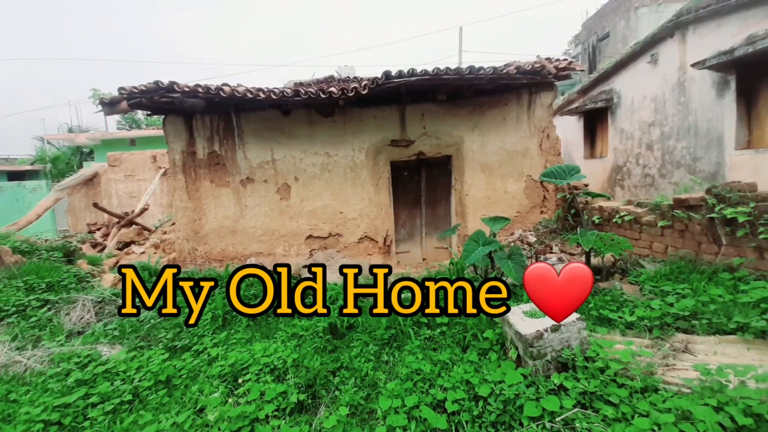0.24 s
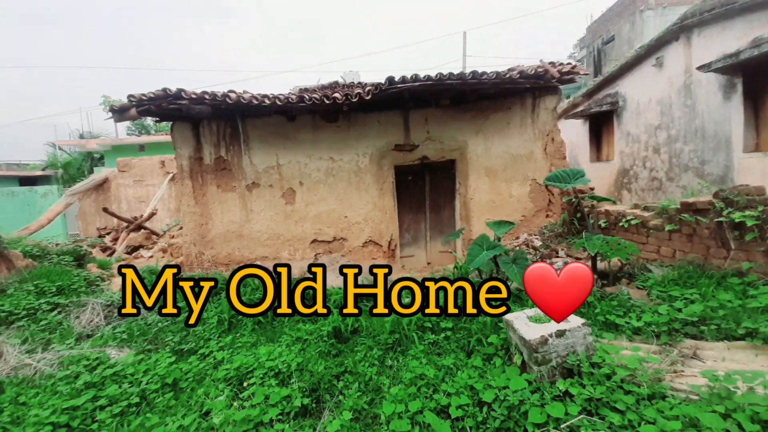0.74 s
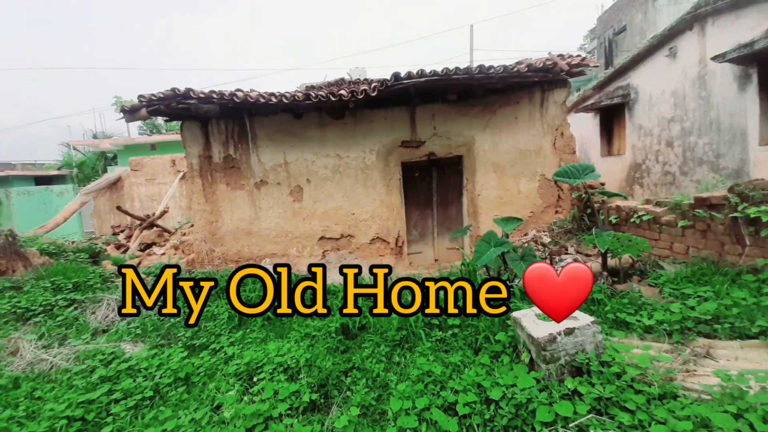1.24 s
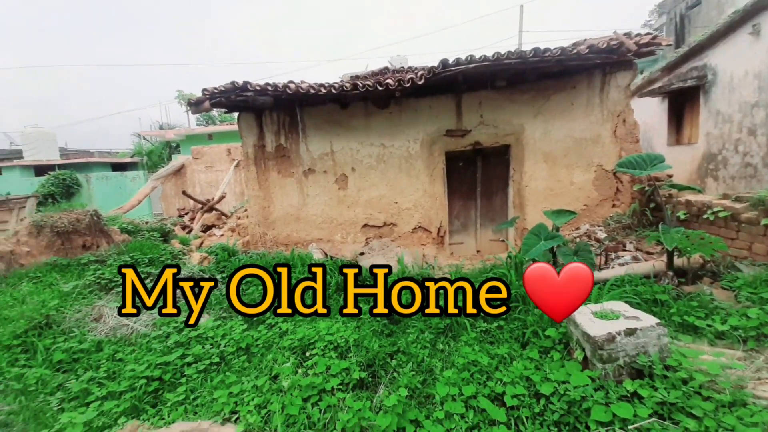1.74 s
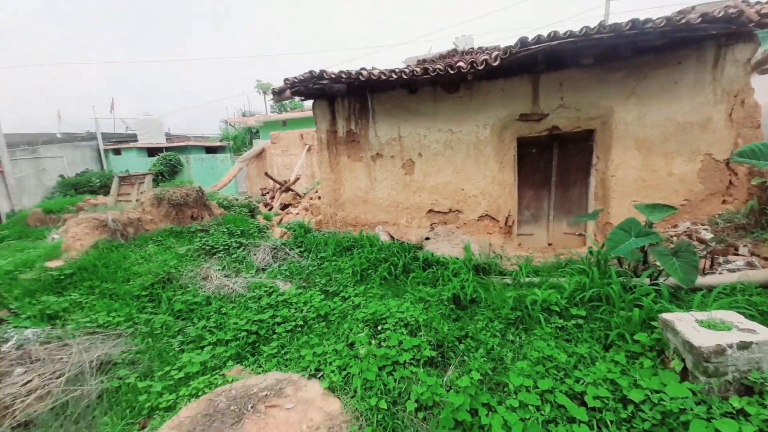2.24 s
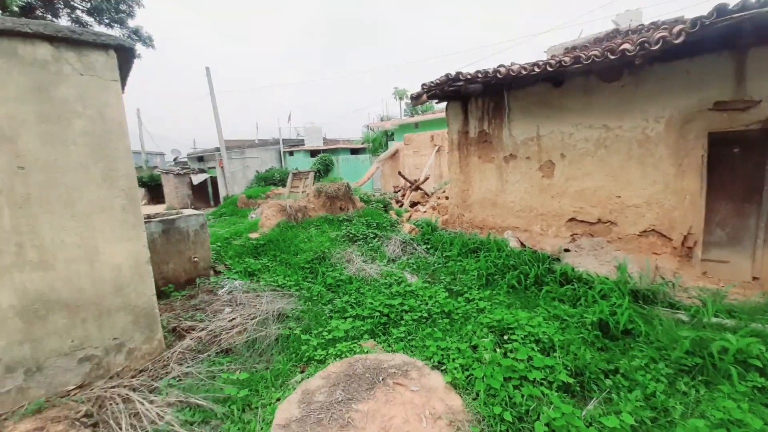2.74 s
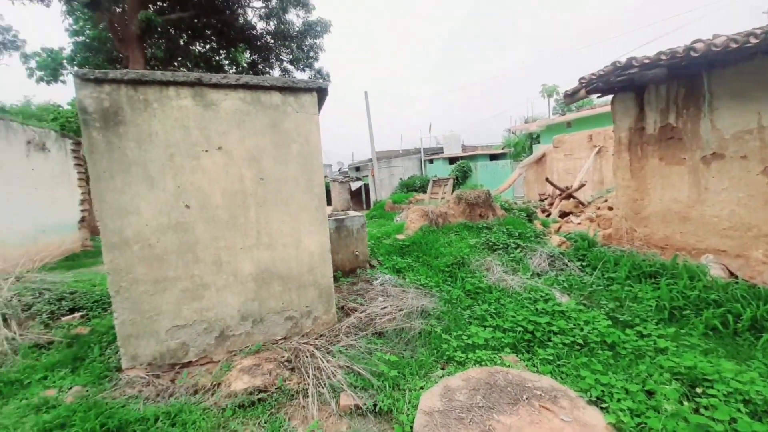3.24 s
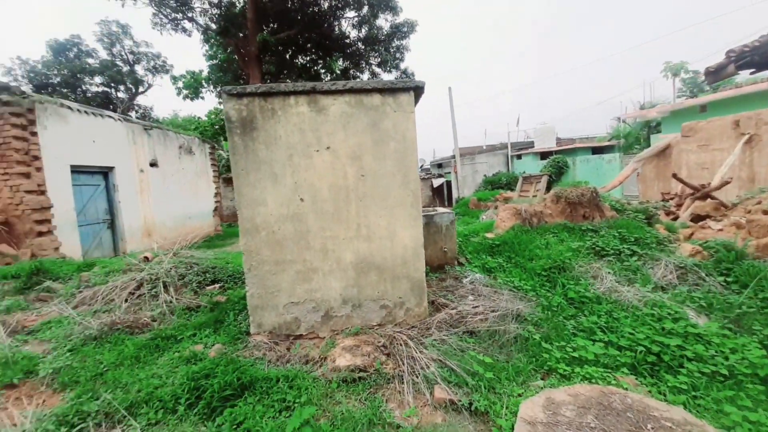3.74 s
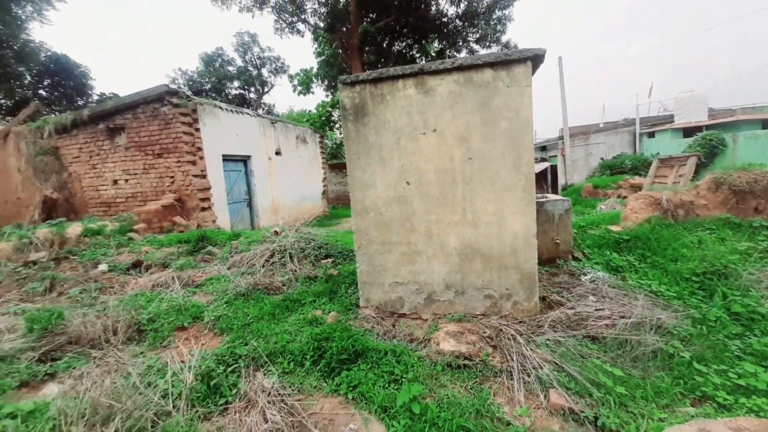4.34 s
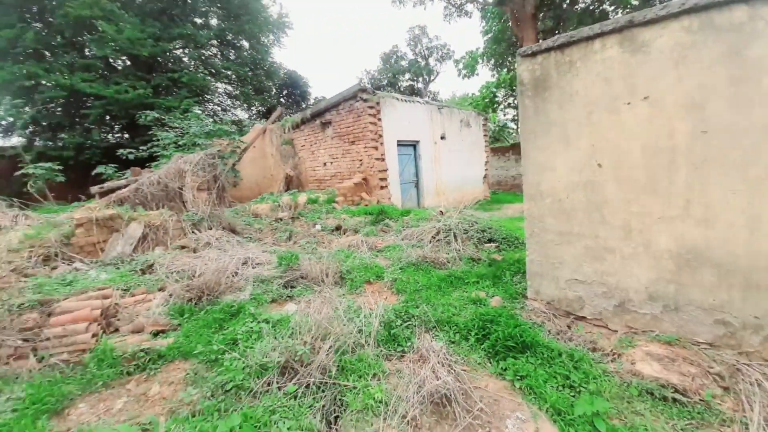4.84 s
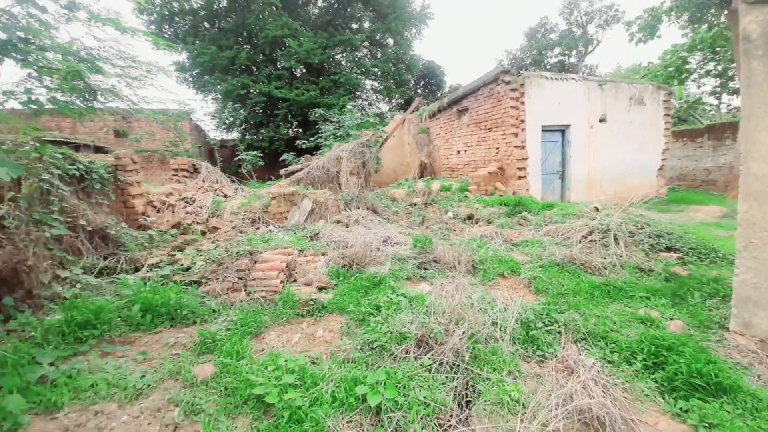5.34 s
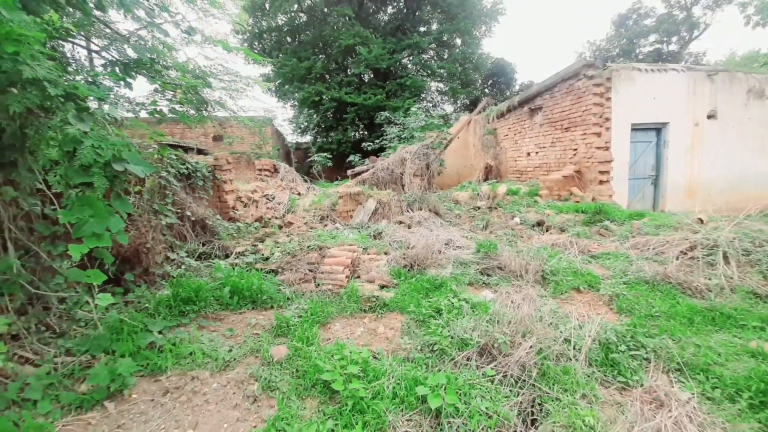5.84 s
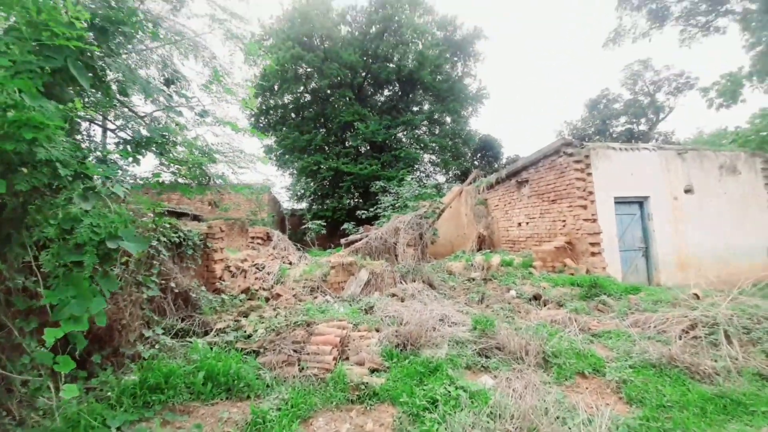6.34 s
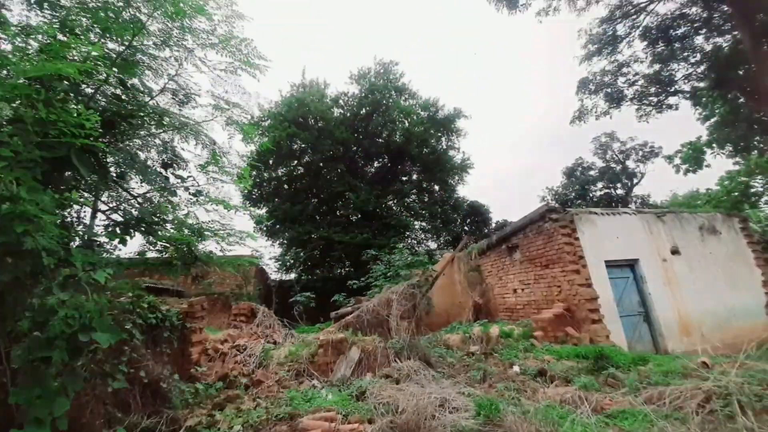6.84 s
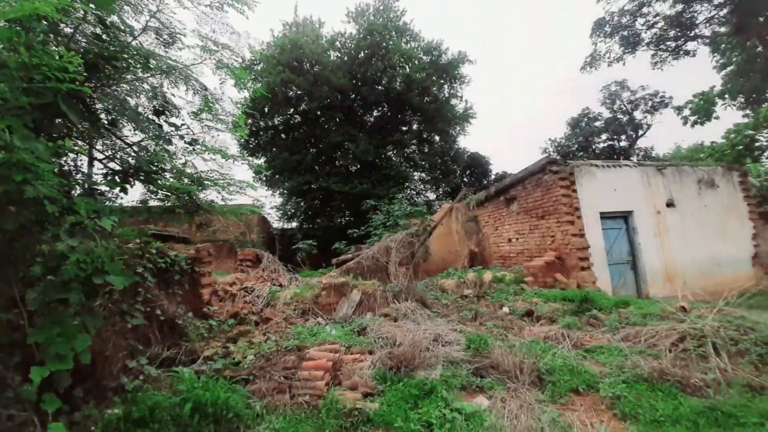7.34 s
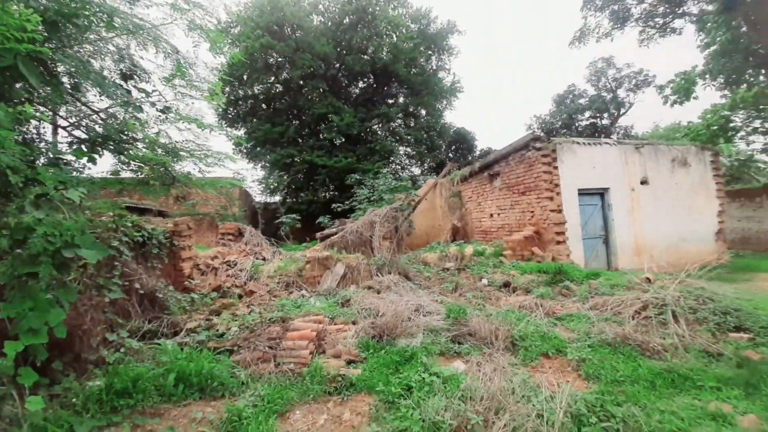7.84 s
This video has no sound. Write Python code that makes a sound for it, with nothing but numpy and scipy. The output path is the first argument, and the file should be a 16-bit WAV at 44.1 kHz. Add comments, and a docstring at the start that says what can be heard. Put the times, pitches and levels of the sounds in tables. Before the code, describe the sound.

A quiet overgrown village yard with low distant rumble and soft open air. Faint bird chirps come first, then slow steps crush dry grass, with crackles, swishes and two loud sharp twig snaps around the middle of the steps. A bent stem creaks briefly, soles shuffle with dull knocks, then only birds, echoing off house walls, and a faint high tone remain. Handheld stereo microphone close to the walker.

```python
"""A low village rumble, open air and a small bird's chirp are heard first, with a faint, distant high tone.
Then someone takes a few slow steps through dry grass: filtered noise swishes, and bursts of it crackle.
Short damped clicks snap as twigs, trains of slips creak as a bent stem, and dull knocks are shuffling feet.
Gliding sine notes are the birds between the house walls; slow level curves shape the noise of the village."""
import sys
import numpy as np
from scipy import signal
from scipy.fft import rfft, irfft, next_fast_len
from scipy.io import wavfile
from scipy.ndimage import map_coordinates

SR = 44100
rng = np.random.default_rng(int(sys.argv[2]) if len(sys.argv) > 2 else 0)


def master(y):
    """Save y as 16-bit WAV."""
    cut = np.clip(np.atleast_2d(y).T, -1, 1)
    pcm = np.round(cut * 32767)  # scale
    wavfile.write(sys.argv[1], SR, pcm.astype(np.int16))


N = 357201

# Twigs that break. Each row: start in seconds, crack level setting in dB, crack pitch in Hz,
# knock setting in dB against the crack, bright tick in dB against the crack, tearing time in ms.
TWIGS = [(0.938, -49, 2190, -0.5, -23, 1), (1.233, -47.5, 3830, -7, -8.5, 1),
         (1.3116, -48, 2660, -3, -23, 1), (1.3359, -47.5, 2080, -4, -22, 1),
         (1.6325, -44, 4200, -12, -4.5, 2.6), (1.6442, -42, 4560, -18, -13.5, 1),
         (1.7106, -48.5, 2720, 1.5, -16.5, 2), (1.8717, -42.5, 4260, -6, -7, 2),
         (1.9155, -50.5, 3500, -4, -5, 1.16), (1.9708, -49.5, 4570, 0, 1.5, 1),
         (2.1058, -48.5, 4400, -13, 7, 1), (2.1839, -47, 2970, -11, -10, 1.02),
         (2.2614, -43.5, 3060, 0.5, -12, 2.1), (2.2846, -39, 2300, -3, -21, 0.78),
         (2.3181, -41, 3470, -25, -12, 1), (2.3796, -26.5, 3780, -9, -21.5, 1.3),
         (2.3881, -47.5, 3050, 8, -9, 2), (2.4084, -45.5, 3900, -4, 2, 1.7), (2.4533, -45, 3970, -4, 3, 1),
         (2.5289, -18, 2660, -2, -43, 2.6), (2.6108, -42, 2690, -5, -25, 1),
         (2.637, -44, 2700, -10, -11, 1), (2.6763, -14.5, 2760, -6, -35, .3),
         (2.8739, -38.5, 3170, -9.5, -22, 2), (2.901, -44, 3700, -5, -10, 1),
         (3.2398, -46, 3760, -25, -11, 1), (3.4103, -36.5, 3560, -21, -22, 1),
         (3.4492, -40, 3030, -26, -11.5, 1), (3.5624, -27.5, 2800, -38, -28, .5),
         (3.5742, -38.5, 2900, -26, -14.5, 1.7), (3.6177, -46, 3050, -20, -14, 1),
         (3.6748, -44.5, 2560, -18, -26, 1), (3.8279, -47.5, 3220, -21, -5.5, 1),
         (4.1178, -64.5, 4200, -8, 18, 1), (4.1628, -39.5, 2920, -19, -26, 3),
         (4.206, -59.5, 4000, -10, 4, 1), (4.2219, -30.5, 2570, -16.5, -30, 1.4),
         (4.2223, -30, 4330, -14, -24.5, 1.2), (4.4313, -45.5, 3680, -5, -7.5, 2),
         (4.534, -35, 2240, -7, -36.5, 1), (4.6369, -44.5, 2700, -38, -15, 1),
         (5.116, -58.5, 1980, 1, -2, 1.1), (5.471, -67.5, 4080, -10, 5, 1),
         (5.5286, -48.5, 3720, -6, -9.5, 1), (5.539, -53.5, 3470, -9, 12.5, .6)]
# How far the twigs lean left. Each row: frequency in Hz, left against right in dB.
TWIG_LEAN = [(500, -0.5), (1200, -3.5), (2500, 11.5), (5000, 4), (9000, 14)]
# Small straws: mean level setting and scatter in dB, middle pitch in Hz
STRAW_DB, STRAW_SCATTER_DB, STRAW_HZ = -57.5, -2, 3800
STRAW_KNOCK_DB, STRAW_TICK_DB = -5.5, -1.5  # settings against the crack, in dB


def twigs(sweep, count=52):
    """Twigs break under the sole; small straws break at random, the more often the harder a leg sweeps."""
    out = np.zeros((2, N))
    for start, *twig in TWIGS:
        add(out, start, snap(*twig))
    # one straw for each equal share of the total sweeping
    shares = (np.arange(count) + rng.random(count)) / count
    times = np.searchsorted(np.cumsum(sweep) / sweep.sum(), shares) / SR
    variations = np.clip(rng.standard_normal((count, 3)), -2, 2)
    for start, (size, pitch, tick) in zip(times, variations):
        level_db = STRAW_DB + STRAW_SCATTER_DB * size
        straw_hz = STRAW_HZ * np.exp(.2 * pitch)
        add(out, start, snap(level_db, straw_hz, STRAW_KNOCK_DB, STRAW_TICK_DB + 4 * tick, 0.93))

    def lean(hz):
        gains = amp(along(TWIG_LEAN, hz) * np.array([[.5], [-.5]]))
        return gains / np.sqrt(np.mean(gains ** 2, axis=0))

    return filtered(out, lean)


SPLINTER_DB, SPLINTER_FOLLOWS = -2.5, 0.6  # dB against the crack at zero tick, and dB per dB of tick


def snap(db, hz, knock_db, tick_db, tear_ms):
    """A twig gives way fibre by fibre within a few ms, rings briefly and rattles the stalks around it."""
    t = np.arange(SR // 25) / SR
    fibres = amp(-27.5 - 60 * t / .028) * rng.standard_normal((2, len(t)))  # the fading rattle
    tears_at = (rng.uniform(.15, 1, 5) * np.clip(tear_ms, .1, 8) * SR / 1000).astype(int)
    fibres[:, 0] = 1  # the first break
    tears = rng.standard_normal(5) + .5 * rng.standard_normal((2, 5))
    fibres[:, tears_at] += 0.28 * np.sqrt(tear_ms) * tears
    knock = [(652, 1.86, knock_db - 11.0), (1370, 0.91, knock_db - 0.5)]
    crack = (hz, 1.7, 0)
    splinter = (6300, 1.3, SPLINTER_DB + SPLINTER_FOLLOWS * tick_db)
    tick = (12600, 1.6, tick_db)
    wood = click(knock + [crack, splinter, tick])
    sound = signal.fftconvolve(fibres, wood[None], axes=1)
    return amp(db + 21.5) * sound * np.linalg.norm(wood) / np.linalg.norm(sound, axis=1, keepdims=True)


# A bent stem sticks and slips. Each row: start in seconds, length in seconds,
# first and last middle rate in slips per second, middle slip level in dB.
CREAKS = [(3.466, .05, 450, 400, -37), (3.51, 0.062, 390, 280, -35), (3.927, 0.056, 130, 44, -37.5),
          (4.003, 0.078, 84, 130, -38.5)]
# The stem squeaks. The row: start in seconds, length in seconds, start, middle and end pitch in Hz, level in dB.
SQUEAK = (4.164, .018, 2150, 2400, 3000, -37)


def creaks():
    """A stem slips at a gliding, uneven rate; each slip rings it briefly, and one quick glide squeaks."""
    slips = np.zeros(N)
    for start, length, first_rate, last_rate, db in CREAKS:
        n = int(length * SR)
        rate = np.geomspace(first_rate, last_rate, n) * np.exp(0.17 * wobble(150)[:n])
        slipping = np.diff(np.floor(np.cumsum(rate) / SR), prepend=-1) > 0
        add(slips, start, slipping * amp(db + 1.5 * rng.standard_normal(n)))
    ring = click([(2620, 1.67, 1), (7000, 0.73, -21)])
    out = signal.fftconvolve(slips, ring / np.abs(ring).max())[:N]
    start, *note, db = SQUEAK
    add(out, start, amp(db) * whistle(*note, 0))
    return sides(10.6) * out


# Soft knocks of the soles on the ground. Each row: start in seconds, tap level in dB,
# thud setting in dB against the tap, left against right in dB.
KNOCKS = [(2.262, -31, -14, 2), (4.429, -47.5, -3, 0), (5.001, -44.5, -6, -21), (5.116, -52, -11, 2),
          (5.175, -43, -3, -17), (5.237, -43, -24, -3), (5.293, -37, -12, -8), (5.341, -34.5, -12.5, -7),
          (5.408, -42.5, -7, -16), (6.262, -56, 7, -17), (6.503, -46.5, -4.5, -8.5)]
SETTLE_S = 0.00611  # from the tap to the thud
THUMP_DB, THUMP_FADE_DB_PER_S = -24, 149.5  # ground rumble against the tap, and its fade
PRESS_S = 0.058  # the weight comes on, in seconds


def knocks():
    """The sole meets firm ground with a dull, gritty tap and settles with a low thud a moment later."""
    out = np.zeros((2, N))
    t = np.arange(SR // 25) / SR
    tap = click([(830, 0.85, -2.0), (2830, 1.0, -9.5)])
    thud = click([(350, 0.86, 0)])
    for start, db, thud_db, pan_db in KNOCKS:
        grit = amp(-29.5 - 60 * t / 0.15) * rng.standard_normal((2, len(t)))
        grit[:, 0] = 1
        gritty_tap = signal.fftconvolve(grit, tap[None], axes=1) / np.abs(tap).max()
        add(out, start, amp(db) * sides(pan_db) * gritty_tap)
        low_thud = thud / np.abs(thud).max()
        add(out, start + SETTLE_S, amp(db + thud_db + 4.0) * sides(pan_db) * low_thud)
    thumps = [(start, 0, db + THUMP_DB) for start, db, *_ in KNOCKS]
    return out + strokes(thumps, PRESS_S, THUMP_FADE_DB_PER_S) * rush(RUMBLE)


# The full weight crunches a tuft. Each row: start in seconds, length in seconds, level setting in dB.
TUFTS = [(1.618, 0.051, -53.5), (1.86, 0.056, -55), (2.562, 0.08, -47), (2.646, 0.036, -47),
         (2.708, 0.044, -41), (4.168, 0.044, -51.5), (4.212, 0.039, -46), (4.526, 0.036, -48),
         (4.631, 0.019, -55.5)]
# Colour of that crunch. Each row: frequency in Hz, strength in dB.
TUFT_COLOUR = [(500, -7.5), (1200, -5.5), (2400, -3), (3400, -6.5), (5000, -7.5), (6500, -12.5),
               (10000, -20.5)]


def tufts():
    """Under the full weight, a bundle of straws collapses in one short, dense crunch."""
    weight = np.zeros(N)
    for start, length, db in TUFTS:
        add(weight, start, amp(db + 0.5) * np.sqrt(np.abs(np.hanning(int(length * SR)))))
    straws = fractures(rate=760, spread_db=4.0, life_s=0.00071)
    return weight * sides(4) * crunch(TUFT_COLOUR, straws, rub_db=-8.5)


# A leg sweeps through the blades. Each row: start of the hold in seconds, hold in seconds, level setting in dB.
SWEEPS = [(0.86, 0.074, -66), (1.27, .08, -69.5), (1.66, .14, -63), (1.83, 0.097, -58), (2.02, .16, -57.5),
          (2.28, .17, -55.5), (2.7, 0.055, -56), (2.93, .12, -62.5), (3.11, .1, -57), (3.25, .33, -54.5),
          (3.66, .22, -62), (4.03, .09, -60), (4.18, .06, -55), (4.35, .08, -64), (4.52, .1, -66)]


def leg_sweeps():
    """The strength of the sweeping leg: the blades bend in 0.07 s, then settle at 85 dB per second."""
    return strokes(SWEEPS, attack_s=.07, fade_db_per_s=85)


# A sole presses on the grass. Each row: start of the hold in seconds, hold in seconds,
# crackle and crush level settings in dB.
STEPS = [(0.844, 0.15, -69, -74), (1.202, 0.45, -64.5, -61.5), (1.647, 0.31, -54.5, -61),
         (2.072, 0.27, -55, -63.5), (2.3, .09, -45.5, -50.5), (2.69, .07, -43.5, -53),
         (2.887, 0.53, -58, -65.5), (3.45, 0.11, -51, -57), (3.624, 0.091, -60.5, -61.5),
         (3.938, 0.21, -59.5, -61), (4.167, 0.11, -55.5, -61.5), (4.407, 0.21, -56.5, -60),
         (5.167, 0.29, -82, -71)]
EASE_DB_PER_S = 127  # the weight comes off
# Colours of the crushed mat, the crackling stalks and the swishing blades (clothes use the last one too).
# Each row: frequency in Hz, strength in dB.
CRUSH = [(200, -23.5), (450, -1.5), (1000, 3), (1700, -1), (3000, -1.5), (6000, -70)]
CRACKLE = [(900, -27.5), (1800, -2.5), (2800, 3), (4200, 3.5), (6000, -1), (8000, -1.5), (9500, -33),
           (14000, -29.5)]
SWISH = [(3000, -4), (6000, -5), (8000, 5), (9800, -6), (11200, 0), (12400, 6.5), (14000, 0.5), (16000, 2)]


def grass(sweep):
    """The sole crushes the mat, dry stalks crackle, and blades swish along the leg, mostly on the left."""
    crackling = strokes([(start, hold, db) for start, hold, db, _ in STEPS], PRESS_S, EASE_DB_PER_S)
    crushing = strokes([(start, hold, db) for start, hold, _, db in STEPS], PRESS_S, EASE_DB_PER_S)
    clumps = amp(1.2 * wobble(45))  # uneven thickness, a gain near 1
    stalks = fractures(rate=520, spread_db=6.5, life_s=.0007)
    mat = unit(stalks + fractures(rate=140, spread_db=3.0, life_s=0.0022))
    tips = unit(.6 * stalks + fractures(rate=400, spread_db=7, life_s=.0008))
    crush = amp(1) * crushing * sides(1.1) * crunch(CRUSH, mat, rub_db=-4.0)
    crackle = amp(-1.5) * crackling * sides(3.2) * crunch(CRACKLE, stalks, rub_db=-2.0)
    swish = amp(3) * sweep * sides(11.5) * crunch(SWISH, tips, rub_db=-1.5)
    return clumps * (crush + crackle + swish)


def fractures(rate, spread_db, life_s):
    """Amplitude of dry stalks giving way at random: each break starts at once and dies within a few ms."""
    sizes = amp(spread_db * np.minimum(rng.exponential(size=N), 2.5)) ** 2
    breaks = (rng.random(N) < rate / SR) * sizes
    fall = np.exp(-1 / (life_s * SR))
    return unit(np.sqrt(signal.lfilter([1], [1, -fall], breaks)))


def crunch(spectrum, breaks, rub_db):
    """Noise of rms 1 that bursts with every break, over the even rubbing of the blades or threads."""
    mid, side = rng.standard_normal((2, N))
    pair = np.array([mid + .8 * side, mid - .8 * side])
    return unit(coloured(breaks * pair, spectrum) + amp(rub_db) * rush(spectrum))


# Clothes brush softly as the walker turns. Each row: start of the hold in seconds, hold in seconds, level in dB.
BRUSH = [(.26, .12, -80), (4.7, .4, -76.5), (5.5, .5, -76)]


def clothes():
    """A faint, high brushing of fabric, made of bursts on threads over an even rubbing."""
    threads = fractures(rate=200, spread_db=3, life_s=.002)
    brushing = strokes(BRUSH, attack_s=0.13, fade_db_per_s=11.5)
    return brushing * sides(8) * crunch(SWISH, threads, rub_db=-2.5)


# Single bird chirps; the second row is the first one's faint echo off a wall.
# Each row: start in seconds, length in seconds, start, middle and end pitch in Hz,
# level in dB, trill depth in Hz.
CHIRPS = [(0.134, 0.048, 4800, 3320, 2400, -61.5, 102), (0.188, .07, 4400, 3630, 3050, -71, 60),
          (.35, 0.044, 4300, 4600, 4940, -73, 100), (1.289, 0.0445, 4100, 4210, 4230, -58, 0),
          (1.389, 0.12, 1750, 1700, 1690, -61, 30), (1.56, 0.04, 3750, 4370, 4800, -55, 347),
          (2.785, 0.15, 6000, 5640, 5600, -67, 80), (3, 0.063, 3140, 2980, 3070, -56.5, 21),
          (3.067, 0.031, 3920, 4280, 4140, -47, 40), (3.823, 0.11, 5080, 4450, 3970, -61, 90),
          (4.115, 0.052, 4400, 4180, 4170, -59, 2), (5.596, 0.12, 6000, 5860, 5770, -68, -4),
          (5.836, 0.031, 3060, 3370, 2950, -61.5, 8), (5.981, 0.054, 3080, 3400, 2710, -60.5, 6),
          (6.123, 0.055, 6100, 6460, 6770, -64, 95), (6.246, 0.069, 4700, 4090, 3840, -59, 377),
          (6.291, 0.079, 3950, 4060, 4340, -55.5, 410), (6.452, 0.052, 6300, 6370, 6580, -67.5, 52),
          (6.544, 0.041, 6050, 6300, 6800, -63, 63), (6.675, 0.091, 4500, 3850, 2890, -53.5, 59),
          (6.902, 0.053, 3444, 3250, 3170, -63.5, 78), (7.024, 0.089, 6250, 5730, 5070, -67, 200),
          (7.07, 0.1, 5200, 4690, 4590, -54.5, 226)]
# Runs of one repeated note. Each row: start in seconds, length in seconds, note spacing in seconds,
# start and end pitch of the note in Hz, level in dB at the start and at the end of the run.
RUNS = [(0.487, .075, 0.022, 3740, 4260, -71, -58), (1.017, .19, .066, 4380, 4275, -54, -57)]
# The birds sound blurred at first, drier around 3 s, and most blurred from about 6 s.
# Each row: time in seconds, level in dB of the sound sent to the echoes.
BLUR = [(0, -2), (3.2, -8), (6.2, -0.5)]
NOTE_SHARE = 0.61  # part of the spacing that a note in a run fills
WALL_S, WALL_DB = .064, -19  # echo off a house wall: delay, and level against the sound sent to the echoes


def birds():
    """Small birds call from the trees, singly and in runs; a house wall repeats them, the yard blurs them."""
    calls = np.zeros(N)
    for start, length, start_hz, middle_hz, end_hz, db, trill_hz in CHIRPS:
        add(calls, start, amp(db) * whistle(length, start_hz, middle_hz, end_hz, trill_hz))
    for start, length, spacing, start_hz, end_hz, first_db, last_db in RUNS:
        note = whistle(NOTE_SHARE * spacing, start_hz, (start_hz + end_hz) / 2, end_hz, 0)
        for late in np.arange(0, length, spacing):
            note_db = first_db + (last_db - first_db) * late / length
            add(calls, start + late, amp(note_db) * note)
    direct = sides(1.0) * calls
    blur_db, = curves(BLUR)
    echoing = amp(blur_db) * direct
    wall = filtered(echoing, lambda hz: np.exp(-2j * np.pi * hz * WALL_S))  # a pure delay
    return direct + amp(WALL_DB) * wall + yard(echoing, stretch=2.7)


def whistle(length, start_hz, middle_hz, end_hz, trill_hz):
    """A pure note that bends through three pitches, with a fast trill on it when trill_hz is not 0."""
    t = np.arange(int(length * SR)) / SR
    u = t / length
    bend = np.polyfit([0, .5, 1], [start_hz, middle_hz, end_hz], 2)
    hz = np.polyval(bend, u) + trill_hz * np.sin(2 * np.pi * 125 * t)
    return np.sin(np.pi * u) ** 0.61 * np.sin(2 * np.pi * np.cumsum(hz) / SR)


# The yard's echo. Each row: frequency in Hz, seconds to fall by 60 dB before stretching.
YARD = [(300, 0.53), (2500, 0.18), (6000, 0.33), (14000, 0.12)]


def yard(x, stretch):
    """The diffuse answer of the walls: a fading noise tail, 10 ms late, in which the lows last longest."""
    hz, t, noise = signal.stft(rng.standard_normal((2, SR)), SR, nperseg=256)
    fade = amp(-60 * t / (stretch * along(YARD, hz)[:, None]))
    tail = signal.istft(noise * fade, SR, nperseg=256)[1]
    tail = np.pad(tail / np.linalg.norm(tail[0]), ((0, 0), (SR // 100, 0)))
    return signal.fftconvolve(x, tail, axes=1)[:, :N]


# The village, its rumble quieter behind the shed.
# Each row: time in seconds, level settings in dB of the rumble and of the murmuring air.
VILLAGE = [(0, -63, -62.5), (1.4, -58.5, -63), (2.6, -60, -60), (3.2, -61, -66.5), (3.6, -60, -64.5),
           (4.2, -65, -60.5), (4.7, -67.5, -64.5), (6.4, -67, -65), (8.1, -63, -66.5)]
# The open air. Each row: time in seconds, level in dB of the hush and of the distant tone.
OPEN_AIR = [(0, -67, -77), (1, -64.5, -76.5), (5, -64, -73.5), (6.1, -64, -72), (6.7, -65.5, -70),
            (7.3, -65.5, -66.5), (8.1, -64, -67.5)]
# Faint drones of the village. Each row: centre in Hz, distance in Hz to half strength, level in dB.
DRONES = [(182.7, 6.1, -77.5), (308, 29, -76.5), (452.4, 12, -72.5)]
# Colours of the rumble (also under the knocks), the murmuring air and the hush.
# Each row: frequency in Hz, strength in dB.
RUMBLE = [(22, -28), (36, -8), (50, 2), (62, 6), (76, -2.5), (95, 1), (125, 4), (155, -0.5), (195, -4.5),
          (240, -5), (330, -45)]
LOW_AIR = [(120, -34.5), (220, -0.5), (290, 3.5), (370, -1.5), (460, 0), (560, -10.5), (900, -65.5)]
AIR = [(300, -23), (560, -3), (680, 1), (780, -4), (870, 1), (1150, -5.5), (1500, -6), (2300, -0.5),
       (3000, -9), (4500, -10.5), (6500, -19), (9500, -27), (12500, -40), (16000, -32.5)]


def background():
    """Village rumble with a weak hum and drones, open air, and a narrow, fuzzy tone far away."""
    rumble_db, low_db = curves(VILLAGE)
    air_db, tone_db = curves(OPEN_AIR)
    rumble = amp(rumble_db + 1.5) * rush(RUMBLE) + amp(low_db - 0.6) * rush(LOW_AIR)
    turn = 2 * np.pi * np.cumsum(62.4 + wobble(4)) / SR  # phase of a wavering pitch
    hum = amp(-72 + 1.9 * wobble(3.0)) * (np.sin(turn) + 0.69 * np.sin(2 * turn))
    drones = sum(amp(db) * narrow(hz, width_hz) for hz, width_hz, db in DRONES)
    tone = np.array([narrow(1857, 85), narrow(1960, 65.5)])  # left, right
    return rumble + hum + drones + amp(air_db) * rush(AIR) + amp(tone_db) * tone


def narrow(centre_hz, width_hz):
    """A fuzzy tone: noise in a narrow band, rms 1."""
    return unit(filtered(rng.standard_normal(N), lambda hz: 1 / (1 + ((hz - centre_hz) / width_hz) ** 2)))


# How alike left and right are. Each row: frequency in Hz, likeness from 0 to 1.
ALIKE = [(60, 0.88), (250, 0.78), (600, 0.18), (2000, 0.12), (6000, 0.051), (12000, 0.019)]


def rush(spectrum):
    """Stereo noise of rms 1, nearly mono in the bass and wide in the treble."""
    def middle_and_side(hz):
        turn = np.arccos(np.clip(along(ALIKE, hz), -1, 1)) / 2
        return amp(along(spectrum, hz)) * [np.cos(turn), np.sin(turn)]

    mid, side = filtered(rng.standard_normal((2, N)), middle_and_side)
    return unit(np.array([mid + side, mid - side]))


def strokes(rows, attack_s, fade_db_per_s):
    """Gain of overlapping strokes (s, hold s, dB): each rises to its time, holds and dies away."""
    t = np.arange(N) / SR
    power = np.zeros(N)
    for start, hold_s, db in rows:
        rise = np.clip((t - start) / attack_s + 1, 0, 1)
        fade_db = np.clip(fade_db_per_s * (t - start - hold_s), 0, 120)
        power += (rise * amp(db - fade_db)) ** 2
    return np.sqrt(power)


def click(bands, size=1024):
    """A causal click made of damped bands (Hz, Q, dB), each with the energy that its dB gives."""
    f = np.fft.rfftfreq(size, 1 / SR) + 1
    power = 0
    for hz, q, db in bands:
        resonance = 1 / (1 + (q * (f / hz - hz / f)) ** 2) ** 1.104
        power = power + amp(db) ** 2 * unit(resonance) ** 2
    # minimum phase: folding the cepstrum puts the energy right at the start
    cepstrum = irfft(np.log(power + power.max() * 1e-6) / 2)
    cepstrum[1:size // 2] *= 2
    cepstrum[size // 2 + 1:] = 0
    return irfft(np.exp(rfft(cepstrum)))


def amp(db):
    """Decibels to gain."""
    return 10 ** (np.asarray(db) / 20)


def unit(x):
    """x at rms 1."""
    return x / np.sqrt(np.mean(x ** 2) + 1e-20)


def along(points, hz):
    """Values at hz between (Hz, value) points, on a log axis."""
    f, v = np.transpose(points)
    return np.interp(np.log(hz + 1), np.log(f + 1), v)


def curves(rows):
    """One value per sample for each column after the time."""
    times, *columns = np.transpose(rows)
    return [np.interp(np.arange(N) / SR, times, column) for column in columns]


def wobble(rate):
    """A smooth random curve, rate knots a second."""
    return map_coordinates(rng.standard_normal(int(N * rate / SR) + 4), [np.arange(N) * rate / SR])


def filtered(x, response):
    """x times a response of frequency."""
    m = next_fast_len(N + SR // 2)
    return irfft(rfft(x, m) * response(np.fft.rfftfreq(m, 1 / SR)), m)[..., :N]


def coloured(x, spectrum):
    """x shaped by the given spectrum, at rms 1."""
    return unit(filtered(x, lambda hz: amp(along(spectrum, hz))))


def sides(pan_db):
    """Left and right gains of mean power 1; positive pan_db leans left."""
    return unit(amp([[pan_db / 2], [-pan_db / 2]]))


def add(track, start, sound):
    """Mix a sound into the track at a time in seconds."""
    i = max(round(start * SR), 0)
    track[..., i:i + sound.shape[-1]] += sound[..., :N - i]


def scene():
    """Twigs, creaks, knocks and tufts come back once off the ground and faintly off the walls."""
    sweep = leg_sweeps()
    feet = twigs(sweep) + creaks() + knocks() + tufts()
    # 10.8 ms late, with a softened treble
    bounce = amp(-21) * filtered(feet, lambda hz: np.exp(-2j * np.pi * hz * .0108) / (1 + 1j * hz / 5000))
    walls = amp(-14.5) * yard(feet, stretch=0.78)
    return feet + bounce + walls + birds() + grass(sweep) + clothes() + background()


TOP_HZ = 15900


def record(dry):
    """Peaks near full scale are rounded off, and nothing from the band limit TOP_HZ up is kept."""
    rounded = dry / (1 + np.abs(dry / .95) ** 8) ** (1 / 8)
    return filtered(rounded, lambda hz: hz < TOP_HZ)


dry = scene()
out = record(dry)
master(out)
```